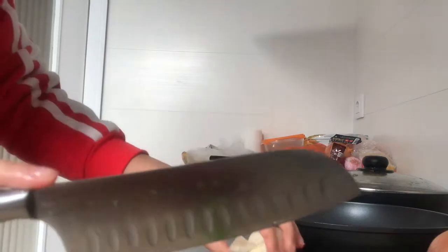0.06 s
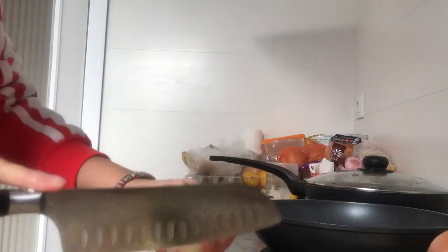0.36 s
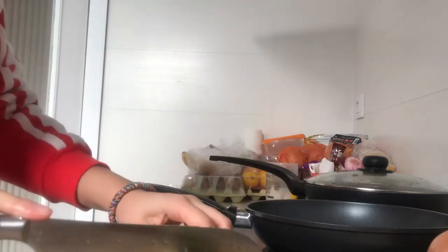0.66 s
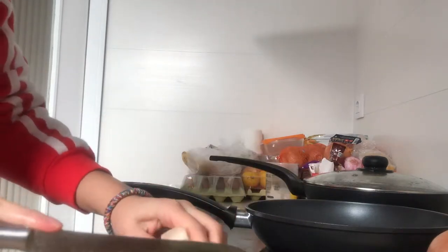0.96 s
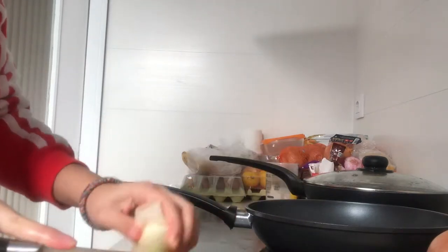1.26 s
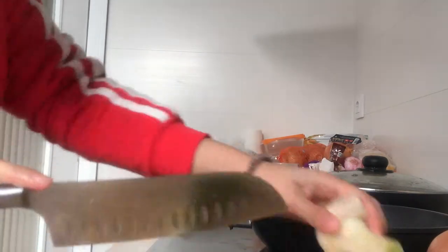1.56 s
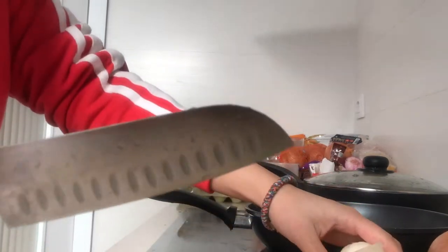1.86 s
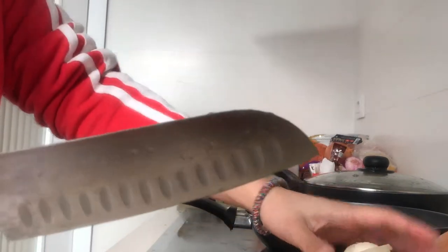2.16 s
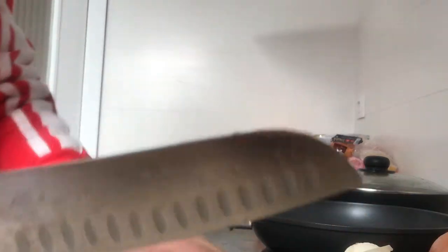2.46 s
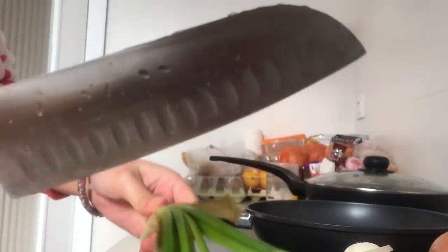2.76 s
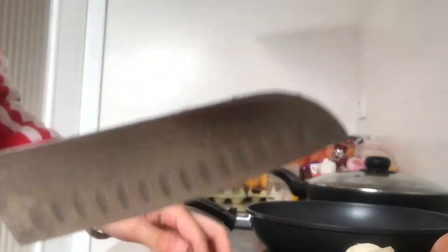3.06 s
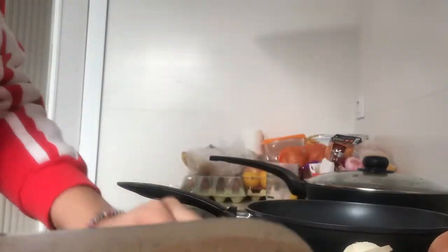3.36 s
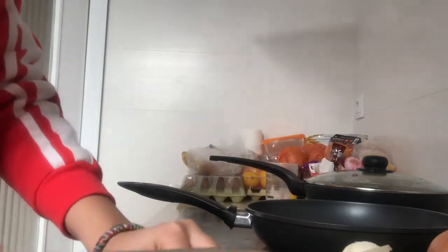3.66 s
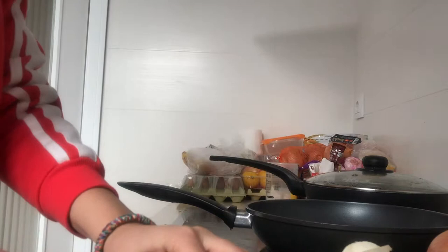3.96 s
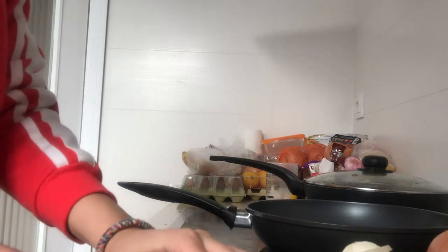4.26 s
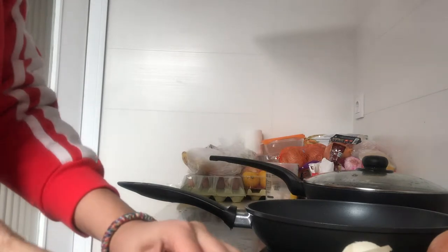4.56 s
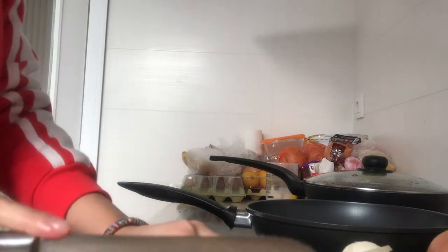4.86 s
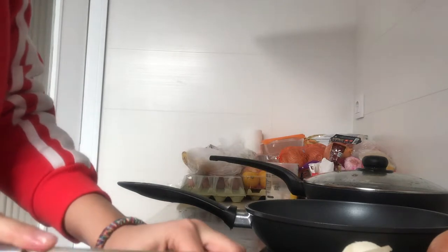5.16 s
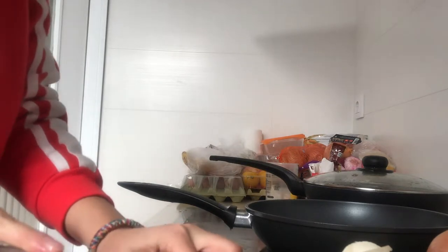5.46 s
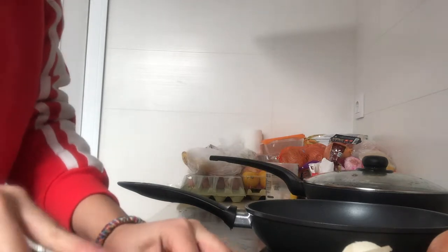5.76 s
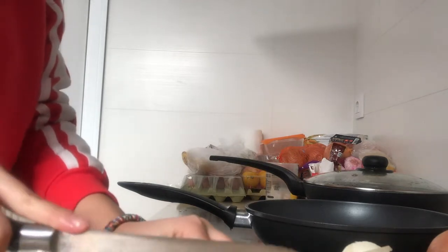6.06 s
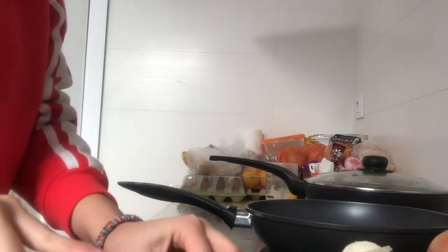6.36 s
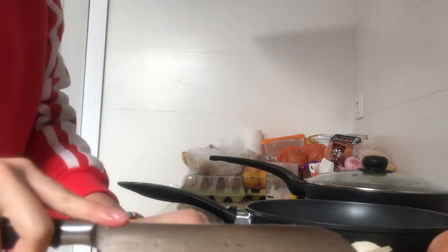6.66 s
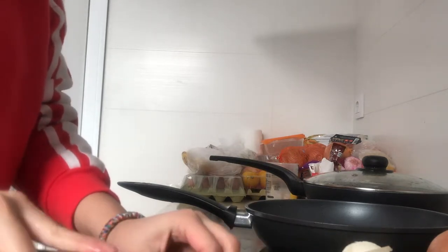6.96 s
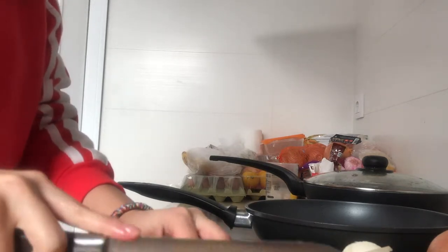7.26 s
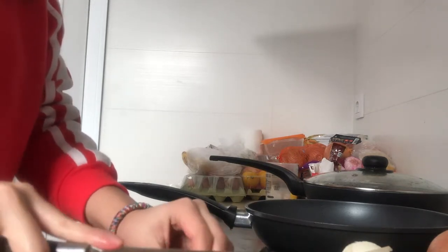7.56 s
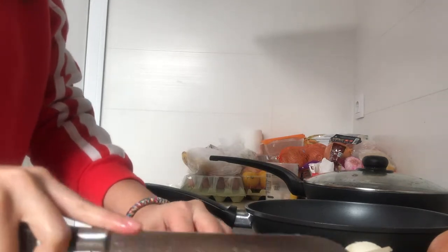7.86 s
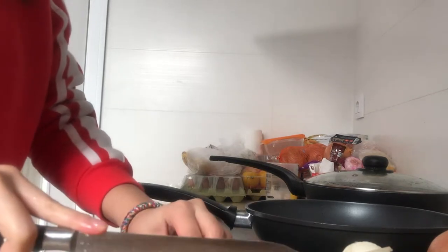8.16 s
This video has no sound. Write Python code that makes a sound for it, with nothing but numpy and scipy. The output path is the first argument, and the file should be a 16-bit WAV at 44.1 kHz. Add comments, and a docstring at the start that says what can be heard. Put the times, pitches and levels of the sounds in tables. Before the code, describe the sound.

A knife trims and slices green onions on a cutting board, with crisp crunches, snapping fibres and knocks in a small kitchen.

```python
"""A knife trims and slices green onions on a cutting board, close by in a small tiled kitchen.
In each cut the blade crunches through the layers, fibres snap, and the edge knocks on the board,
which rings and shakes the counter. Between cuts, leaves rustle and tear, the knife scrapes and hisses
across the board, and its steel rings faintly. Faint swishes, room noise and an appliance hum lie below."""
import sys
import numpy as np
from scipy import signal
from scipy.fft import rfft, irfft, next_fast_len
from scipy.io import wavfile
from scipy.ndimage import map_coordinates

SR = 44100
rng = np.random.default_rng(int(sys.argv[2]) if len(sys.argv) > 2 else 0)


def output_pcm(signal):
    """Save a mono or channel-first signal as 16-bit PCM at the path in sys.argv[1].

    Samples are clipped to [-1, 1] before scaling.
    """
    pcm = np.clip(np.atleast_2d(signal).T, -1, 1) * 32767
    wavfile.write(sys.argv[1], SR, np.round(pcm).astype(np.int16))


N = 371763


def amp(db):
    """Decibels to gain."""
    return 10 ** (np.asarray(db) / 20)


def unit_rms(x):
    """Scale to rms 1."""
    return x / np.sqrt(np.mean(x ** 2) + 1e-20)


def log_interp(points, hz):
    """Read (f/Hz, value) points on a log axis."""
    point_hz, values = np.transpose(points)
    return np.interp(np.log(hz + 1), np.log(point_hz + 1), values)


def decay(t, t60_s):
    """Exponential decay, 60 dB in t60_s."""
    return np.exp(-np.log(1000) * t / t60_s)


def filtered(x, response):
    """Apply the gain response(hz) to x."""
    size = next_fast_len(len(x) + 8192)
    return irfft(rfft(x, size) * response(np.fft.rfftfreq(size, 1 / SR)), size)[:len(x)]


def coloured(x, spectrum):
    """x shaped by (f/Hz, level/dB) points, at rms 1."""
    return unit_rms(filtered(x, lambda hz: amp(log_interp(spectrum, hz))))


def split_bands(x, split_hz):
    """Treble and body of x, each at rms 1."""
    body = filtered(x, lambda hz: 1 / (1 + (hz / split_hz) ** 6))
    return unit_rms(x - body), unit_rms(body)


def wobble(rate_hz):
    """Smooth random curve, rate_hz knots a second."""
    knots = rng.standard_normal(int(N * rate_hz / SR) + 4)
    return map_coordinates(knots, [np.arange(N) * rate_hz / SR])


def add(track, start_s, sound):
    """Mix a sound into the track."""
    part = track[max(round(start_s * SR), 0):][:len(sound)]
    part += sound[:len(part)]


def pressure(strokes, attack_s, release_t60_s, lead_s, lead_db):
    """Treble and body gains of strokes: light first touch, bite, steady swell or ebb, release."""
    gains = np.zeros((2, N))
    for start_s, length_s, treble_db, body_db, swell_db in strokes:
        t = np.arange(-lead_s, length_s + release_t60_s, 1 / SR)
        touch = amp(lead_db) * np.minimum(1 + t / lead_s, 1)
        bite = np.clip(t / attack_s, 0, 1)
        swell = amp(swell_db * (np.clip(t / length_s, 0, 1) - 0.5))
        release = decay(np.maximum(t - length_s, 0), release_t60_s)
        envelope = np.maximum(touch, bite) * swell * release
        add(gains[0], start_s - lead_s, amp(treble_db) * envelope)
        add(gains[1], start_s - lead_s, amp(body_db) * envelope)
    return gains


def friction(gains, spectrum, puffs_per_s, scatter_db, puff_t60_s, smooth, ripple_db, treble_db, body_db):
    """Tiny puffs, as of bursting cells, over smooth friction noise; pressure gains set the strength."""
    sizes = amp(scatter_db * np.minimum(rng.exponential(size=N), 3))
    impulses = sizes * (rng.random(N) < puffs_per_s / SR)
    puff = decay(np.arange(SR // 100) / SR, puff_t60_s)
    power = np.abs(signal.fftconvolve(impulses ** 2, puff ** 2)[:N])
    grain = np.sqrt(power / power.mean() + smooth ** 2) * rng.uniform(-1, 1, N)
    # many close resonances of stalk, blade and board
    ripples = rng.standard_normal(200)
    ripple_hz = np.linspace(0, SR / 2, len(ripples))
    grain = filtered(grain, lambda hz: amp(ripple_db * np.interp(hz, ripple_hz, ripples)))
    treble, body = split_bands(coloured(grain, spectrum), split_hz=5850)
    return amp(treble_db) * gains[0] * treble + amp(body_db) * gains[1] * body


# Room noise spectrum: f/Hz, level/dB
ROOM_SPECTRUM = [(15, -62.5), (28, -25.5), (40, -2.5), (84, -7), (185, -14), (373, -14.5), (450, -17.5),
                 (754, -20), (1500, -24.5), (2300, -36.5), (3500, -38), (5000, -42), (10000, -46.5),
                 (13000, -44), (16000, -47)]
# Room hiss contour: t/s, level/dB
ROOM_HISS = [(0, -71), (.4, -73), (.58, -74.5), (.8, -70.5), (1.5, -69), (1.9, -76.5), (3.3, -81.5),
             (3.9, -75.5), (6.8, -75.5), (8.4, -77.5)]
# Appliance partials: f/Hz, level/dB
HUM_PARTIALS = [(42, -72.5), (82, -71.5), (124, -70)]


def background(murmur_db, waver_db):
    """Quiet room noise with a wavering appliance hum."""
    t = np.arange(N) / SR
    hiss, murmur = split_bands(coloured(rng.standard_normal(N), ROOM_SPECTRUM), split_hz=2300)
    hiss_db = np.interp(t, *np.transpose(ROOM_HISS))
    hum = sum(amp(db + waver_db * wobble(21)) * np.sin(2 * np.pi * hz * t + 2.2 * wobble(12))
              for hz, db in HUM_PARTIALS)
    return hum + amp(murmur_db) * murmur + amp(hiss_db) * hiss


# Faint narrow-band swishes: t/s, length/s, relative level/dB, f/Hz
FAINT_SWISHES = [(0.014, 0.098, -69, 4180), (.34, 0.15, -76.5, 3280), (0.628, 0.19, -73, 3970),
                 (1.845, 0.45, -80.5, 3420), (1.901, 0.69, -79, 1510), (1.037, .03, -46, 2490),
                 (3.61, 0.116, -57, 3600), (8.218, 0.051, -68.5, 2780)]


def faint_swishes(gain_db, width_octaves, edge_s):
    """A narrow noise band fades in and out, like breath or light rubbing."""
    out, t = np.zeros(N), np.arange(SR) / SR
    for start_s, length_s, db, centre_hz in FAINT_SWISHES:
        band = filtered(rng.standard_normal(len(t)),
                        lambda hz: 1 / (1 + (np.log2((hz + 1) / centre_hz) / width_octaves) ** 2))
        envelope = np.clip(np.minimum(t, length_s + edge_s - t) / edge_s, 0, 1)
        add(out, start_s, amp(db + gain_db) * unit_rms(band) * envelope)
    return out


# Handling strokes: t/s, length/s, relative treble/dB, relative body/dB, swell/dB
HANDLING_STROKES = [(.11, .05, -67, -58.5, 1), (.4, 0.027, -68, -67, 8), (2.53, 0.079, -73, -66.5, 9),
                    (.94, 0.17, -69, -71, -2), (3.04, .025, -61, -62.5, -7), (3.15, 0.039, -66, -69.5, -7),
                    (3.46, 0.13, -69, -73.5, -4), (3.6, .135, -51, -59.5, 4),
                    (3.91, .06, -65.5, -67.5, -14), (4, 0.1, -67, -68, -4.5),
                    (4.63, 0.103, -68.5, -65.5, -1), (4.79, .08, -65, -58, 6),
                    (5.45, 0.19, -64.5, -64.5, -9), (5.93, .12, -69.5, -70.5, -2),
                    (6.11, .13, -65.5, -68, 1), (6.48, 0.14, -58, -62, -0.5), (7.13, 0.097, -50, -51.5, -9),
                    (7.35, 0.14, -71, -66, -8.5), (7.77, 0.12, -56, -63, -15)]
# Handling rustle spectrum: f/Hz, level/dB
RUSTLE_SPECTRUM = [(300, -34.5), (600, -7.5), (1000, 3.5), (1700, -8), (2900, -0.5), (4300, -1),
                   (6000, -2.5), (8600, -0.5), (12000, -6.5), (16000, -8)]


def handling_rustle():
    """Leaves rustle, and the blade scrapes back after a chop, with a sparse, uneven grain."""
    gains = pressure(HANDLING_STROKES, attack_s=0.008, release_t60_s=0.12, lead_s=0.02, lead_db=-19.5)
    return friction(gains, RUSTLE_SPECTRUM, puffs_per_s=370, scatter_db=7, puff_t60_s=0.0061,
                    smooth=0.58, ripple_db=4, treble_db=-3.5, body_db=-3)


# Leaves tearing: t/s, length/s, snap rate/Hz, relative level/dB, brightness/dB
LEAF_TEARS = [(0.118, .36, 17, -47.5, 22), (3.594, .044, 150, -26.5, -2), (4.036, .19, 32, -42, 33),
              (4.787, .085, 85, -30, 4), (4.981, .27, 24, -46.5, 31)]


def leaf_tears(max_snaps, gap_jitter, scatter_db):
    """Thin fibres break in a run at uneven gaps; returns rows for fibre_snaps."""
    snaps = []
    for start_s, length_s, rate_hz, db, bright_db in LEAF_TEARS:
        gap_draws, level_draws = rng.standard_normal((2, max_snaps))
        gaps_s = np.exp(gap_jitter * gap_draws) / rate_hz
        delays_s = np.cumsum(gaps_s) - gaps_s
        snaps += [(start_s + delay_s, db + scatter_db * draw, bright_db)
                  for delay_s, draw in zip(delays_s, level_draws) if delay_s < length_s]
    return snaps


# Thick fibres and layers breaking singly: t/s, relative level/dB, brightness/dB
THICK_SNAPS = [(.1441, -30.5, -2), (.42, -35.5, -2), (.9852, -33.5, -8.5), (1.0332, -31, -3.5),
               (1.0378, -14, -45), (1.059, -25.5, -5), (1.08, -27, -10), (1.1502, -23, 12.5),
               (1.1627, -20.5, 6), (1.18, -21, 6), (1.708, -35.5, -29), (2.5296, -41.5, -22),
               (3.545, -34, 13), (3.6772, -33, 1), (3.7304, -37, 9), (4.0193, -31, 1.5), (4.0765, -27, 10),
               (4.4549, -28, 24), (4.4767, -30.5, 2.5), (4.4992, -26, 14), (4.558, -16.5, 20.5),
               (4.5713, -17, 16.5), (4.73, -50.5, -30), (4.9527, -39.5, -0.5), (5.0615, -40, -4.5),
               (5.4236, -43.5, 26.5), (5.4751, -28.5, -8), (5.6297, -35, -11), (5.6491, -26, -12),
               (5.7219, -31.5, 1), (5.7403, -23.5, 19), (5.7952, -27, -2.5), (5.83, -16, 0.5),
               (6.1539, -36.5, 5.5), (6.315, -35.5, 4.5), (6.3745, -19, -6), (6.387, -25.5, 8),
               (6.534, -30, 13), (6.9925, -32, 15), (7.0081, -20.5, -6), (7.0399, -21.5, 7.5),
               (7.1016, -19.5, 20.5), (7.3493, -30.5, -7), (7.531, -39, 11.5), (7.6064, -28.5, 13),
               (7.6241, -26.5, 1), (7.646, -18.5, 10.5), (7.6624, -18, -4.5), (7.7042, -19, 6),
               (7.7246, -17.5, 18.5), (8.0521, -38, -1), (8.098, -36, 3.5), (8.306, -29.5, 7.5),
               (8.3784, -18, 3)]


def fibre_snaps(thin_snaps, gain_db, crack_t60_s, tear_db, tear_t60_s, lag_s):
    """A fibre breaks with a crack and a short tear; thick ones have more body, thin ones more fizz."""
    out, t = np.zeros(N), np.arange(SR // 30) / SR
    noise = rng.uniform(-1, 1, N)
    envelope = decay(t, crack_t60_s) + amp(tear_db) * decay(t, tear_t60_s)
    for k, (start_s, db, bright_db) in enumerate(THICK_SNAPS + thin_snaps):
        burst = noise[k * len(t):][:len(t)] * envelope
        body_db, fizz_db = -16.5 - bright_db / 2, -13 + bright_db / 2
        spectrum = [(300, body_db - 15.5), (1400, body_db - 19), (2200, body_db + 2.5),
                    (3200, body_db + 2.5), (5500, -11), (11000, fizz_db - 6), (16000, fizz_db - 11)]
        snap = filtered(burst, lambda hz: amp(log_interp(spectrum, hz)))
        add(out, start_s + lag_s, amp(db + gain_db) * snap / np.linalg.norm(snap))
    return out


# Blade, hand or stalk hitting the board: t/s, level/dB, treble corner/Hz, boom/dB, extra shake/dB
BOARD_KNOCKS = [(0.656, -49, 110, 7, -4), (1.046, -13.5, 198, 2, 10.5), (1.2007, -9.5, 2900, -3, 6.5),
                (1.779, -35.5, 160, 18, -0.5), (2.528, -32.5, 1110, 6.5, 10.5), (3.055, -30.5, 130, 6, 1),
                (3.184, -27.5, 120, 7.5, 11.5), (4.4561, -21, 775, 6.5, 7), (4.572, -41, 2180, -17, -8),
                (5.631, -38, 500, 0, 14), (5.724, -25.5, 900, 0, 2), (5.75, -20, 557, -2, 10),
                (6.4424, -7.5, 1590, 0.5, -0.5), (7.1086, -11.5, 1470, 9.5, -1.5),
                (7.352, -28, 149, -3.5, 20), (7.7284, -7, 1700, 0, -1), (7.872, -47.5, 893, 11.5, 16.5),
                (8.401, -0.5, 1710, 0.5, 1)]
# Modes of the board on its counter: f/Hz, level/dB, t60/s
BOARD_MODES = [(129.5, -34, 0.19), (232.2, -24, 0.098), (307.4, -25.5, 0.13), (372.3, -23.5, 0.071),
               (539, -30.5, 0.13), (525, -19.5, 0.02), (947, -0.5, 0.015), (1324, -7.5, 0.012),
               (1357, -28.5, 0.15), (1453, -40, 0.07), (1507, -28, 0.17), (1681, -30, 0.056)]
# Counter shake spectrum: f/Hz, level/dB
COUNTER_SPECTRUM = [(60, -30), (110, 2.5), (185, -13), (328, -9.5), (430, -20), (530, -6), (830, -2),
                    (1080, -17), (1350, 4.5), (1650, -4.5), (1950, -8), (4000, -38), (7000, -76)]


def board_knocks(rise_s, boom_hz, counter_db, counter_t60_s, counter_rise_s):
    """The board rings and shakes the counter; soft contacts lose the treble, heavy ones boom."""
    out, t = np.zeros(N), np.arange(SR // 2) / SR
    for start_s, db, corner_hz, boom_db, shake_db in BOARD_KNOCKS:
        ring = np.zeros(len(t))
        for k, (mode_hz, mode_db, t60_s) in enumerate(BOARD_MODES):
            scatter_db, detune = rng.standard_normal(2)
            tone = np.sin(2 * np.pi * mode_hz * (1 + 0.0068 * detune) * t)
            ring += (-1) ** k * amp(mode_db + scatter_db) * decay(t, t60_s) * tone
        shake = coloured(rng.standard_normal(len(t)), COUNTER_SPECTRUM)
        shake *= decay(t, counter_t60_s) * (1 - np.exp(-t / counter_rise_s))
        blow = ring * (1 - np.exp(-t / rise_s)) + amp(counter_db + shake_db) * shake

        def contact(hz):
            bass_shelf = (amp(boom_db) + 1j * hz / boom_hz) / (1 + 1j * hz / boom_hz)
            return bass_shelf / (1 + 1j * hz / corner_hz) ** 2

        add(out, start_s, amp(db) * filtered(blow, contact))
    return out


# Cuts through a stalk: t/s, length/s, relative treble/dB, relative body/dB, swell/dB
CUT_STROKES = [(1.037, .03, -44, -45, 11.5), (1.07, 0.11, -51.5, -59.5, -11.5),
               (1.181, .021, -37.5, -43, 15.5), (5.628, 0.08, -44, -51.5, -7.5),
               (5.72, .1, -47.5, -54, -5.5), (5.83, 0.092, -54, -55, -5.5), (6.373, .069, -38, -45.5, 0),
               (7.008, 0.011, -43, -46.5, 9), (7.039, 0.075, -35.5, -45, 2), (7.645, 0.044, -40, -51, -4.5),
               (7.703, 0.027, -34, -42.5, -4), (8.348, .028, -40, -49, -0.5),
               (8.378, .022, -33.5, -38.5, 7)]
# Stalk crunch spectrum: f/Hz, level/dB
CRUNCH_SPECTRUM = [(150, -21.5), (300, -5), (480, -14.5), (650, -4), (950, -1), (1400, -5), (1850, -5.5),
                   (2500, -1.5), (4500, -4), (7500, -2), (8450, 1), (9300, -3), (13000, -3), (16000, -11)]


def blade_crunch():
    """The blade bites into the layers and cells burst in dense puffs."""
    gains = pressure(CUT_STROKES, attack_s=0.0011, release_t60_s=0.045, lead_s=0.058, lead_db=-13.5)
    return friction(gains, CRUNCH_SPECTRUM, puffs_per_s=700, scatter_db=4.5, puff_t60_s=0.0065,
                    smooth=0.65, ripple_db=-1, treble_db=-4.5, body_db=2.5)


# Contacts that ring the knife: t/s, relative level/dB, favoured f/Hz, spread/octaves
KNIFE_CONTACTS = [(1.202, -47, 2900, .6), (1.708, -67, 2780, .3), (4.551, -56, 7000, 1.5),
                  (4.559, -46.5, 6900, 1.46), (4.572, -50, 3170, 1.07), (4.594, -56, 2800, 0.83),
                  (5.077, -71.5, 8350, .1), (5.829, -56.5, 4040, 1.5), (6.315, -63.5, 8530, .3),
                  (6.372, -44, 8430, 0.075), (6.627, -61, 8900, 0.085), (6.995, -53, 8400, .12),
                  (7.872, -56, 4600, 1.13), (7.883, -36, 5230, .11), (8.218, -57, 8200, 0.13)]
# Modes of the steel: f/Hz, level/dB, t60/s
KNIFE_MODES = [(943, 21, 0.052), (2330, 4, 0.076), (2415, -1, 0.054), (2960, -2.5, 0.18), (3640, -13, .22),
               (4410, 1.5, 0.0707), (5350, -36.5, 1), (6800, -3, 0.14), (8470, 5, 0.11), (9200, -4, 0.26),
               (10800, -8.5, 0.12), (13150, -2, .16), (13200, -1.5, .12)]


def knife_ring(gain_db, rise_s):
    """Where the steel is touched decides which of its modes ring."""
    out, t = np.zeros(N), np.arange(SR // 2) / SR
    for start_s, db, favoured_hz, spread_octaves in KNIFE_CONTACTS:
        ring = np.zeros(len(t))
        for mode_hz, mode_db, t60_s in KNIFE_MODES:
            scatter_db, detune = rng.standard_normal(2)
            weight = np.exp(-(np.log2(mode_hz / favoured_hz) / spread_octaves) ** 2 / 2)
            tone = np.sin(2 * np.pi * mode_hz * (1 + 0.0022 * detune) * t)
            ring += amp(mode_db + scatter_db) * weight * decay(t, t60_s) * tone
        add(out, start_s, amp(db + gain_db) * ring * (1 - np.exp(-t / rise_s)))
    return out


# Slides over the board: t/s, length/s, relative treble/dB, relative body/dB, swell/dB
SLIDE_STROKES = [(2.61, .055, -58.5, -70.5, 6), (4.285, .16, -47.5, -61, 1),
                 (4.445, .145, -49.5, -51, -1.5), (7.865, .015, -57.5, -53.5, 2.5),
                 (8.215, .05, -66.5, -66.5, -6.5)]
# Sliding hiss spectrum: f/Hz, level/dB
SLIDE_SPECTRUM = [(240, -22), (400, -4), (636, -5.5), (814, -7.5), (1160, -4.5), (2180, -4.5), (4180, -2.5),
                  (5030, -6), (12900, -4), (16000, -10.5)]


def board_slides():
    """The knife or a palm slides over the board with a fine, even hiss."""
    gains = pressure(SLIDE_STROKES, attack_s=0.012, release_t60_s=0.055, lead_s=0.038, lead_db=-9.5)
    return friction(gains, SLIDE_SPECTRUM, puffs_per_s=610, scatter_db=2, puff_t60_s=0.002,
                    smooth=0.77, ripple_db=2, treble_db=-4.5, body_db=-2.5)


# Reverberation of the tiled walls: f/Hz, t60/s
WALL_DECAY = [(120, 0.65), (700, .3), (2000, 0.45), (5000, 0.46), (14000, 0.28)]


def kitchen(x, early_db, early_t60_s, tail_db):
    """Near surfaces reflect at once; the tiled walls ring on a little."""
    hz, frames_s, spectra = signal.stft(rng.standard_normal(SR // 2), SR, nperseg=256)
    spectra *= decay(frames_s, log_interp(WALL_DECAY, hz)[:, None])
    _, tail = signal.istft(spectra, SR, nperseg=256)
    t = np.arange(len(tail)) / SR
    tail *= 1 - np.exp(-t / 0.0053)
    early = rng.standard_normal(len(t)) * decay(t, early_t60_s) * (t > 0.002)
    echoes = amp(early_db) * early / np.linalg.norm(early) + amp(tail_db) * tail / np.linalg.norm(tail)
    return x + signal.fftconvolve(x, echoes)[:N]


def scene():
    """Onion, knife and board in the kitchen, mono."""
    crisp = blade_crunch() + handling_rustle() + board_slides()
    thin_snaps = leaf_tears(max_snaps=12, gap_jitter=0.22, scatter_db=2.5)
    crisp += fibre_snaps(thin_snaps, gain_db=6, crack_t60_s=0.0066,
                         tear_db=-10, tear_t60_s=0.018, lag_s=0.0009)
    crisp += knife_ring(gain_db=3, rise_s=0.00029)
    crisp = kitchen(crisp, early_db=-10, early_t60_s=0.035, tail_db=-11)
    knocks = board_knocks(rise_s=0.00034, boom_hz=520,
                          counter_db=-28, counter_t60_s=0.3, counter_rise_s=0.004)
    knocks = kitchen(knocks, early_db=-19, early_t60_s=0.21, tail_db=-11.5)
    swishes = faint_swishes(gain_db=-1.5, width_octaves=0.13, edge_s=0.013)
    return (crisp + knocks + swishes + background(murmur_db=-67.5, waver_db=5.5))[None]


def record(dry):
    """Brick-wall low-pass at 16.1 kHz."""
    return np.array([filtered(channel, lambda hz: hz < 16100) for channel in dry])


dry = scene()
out = record(dry)
output_pcm(out)
```